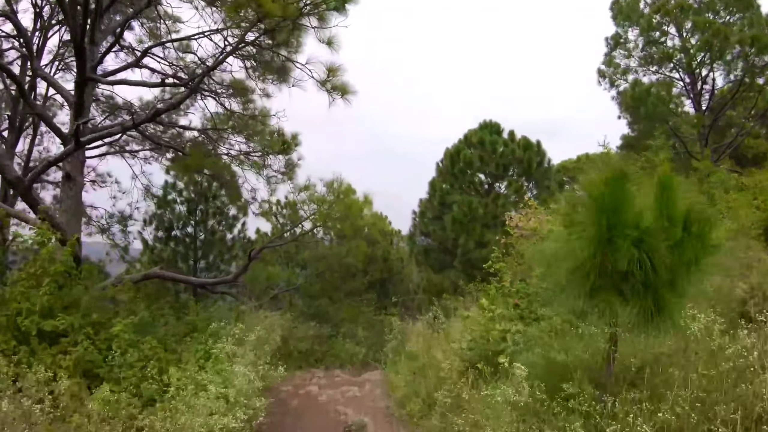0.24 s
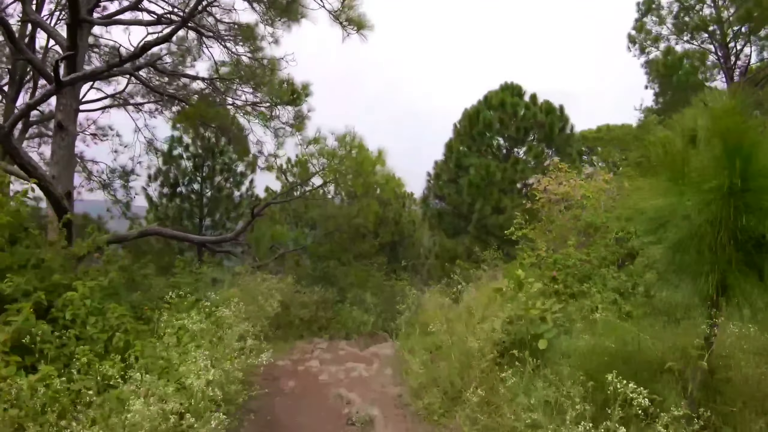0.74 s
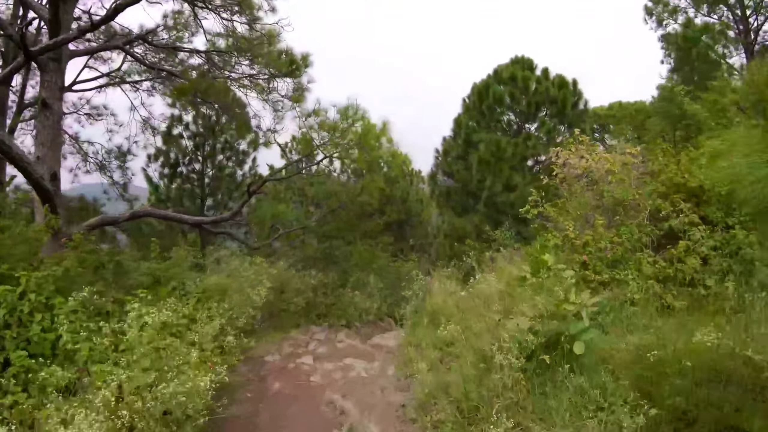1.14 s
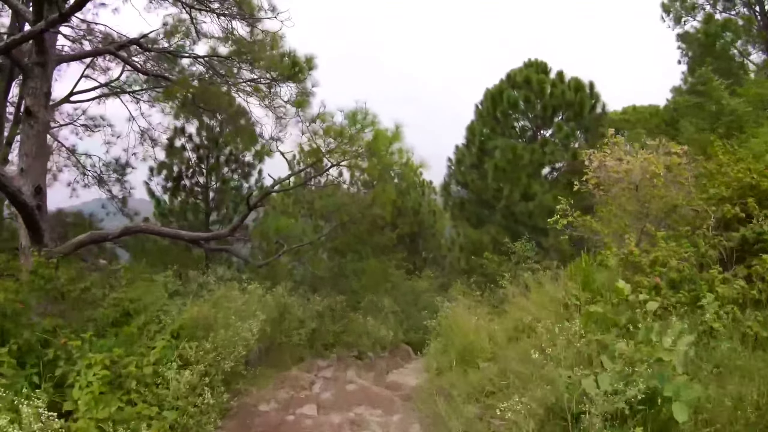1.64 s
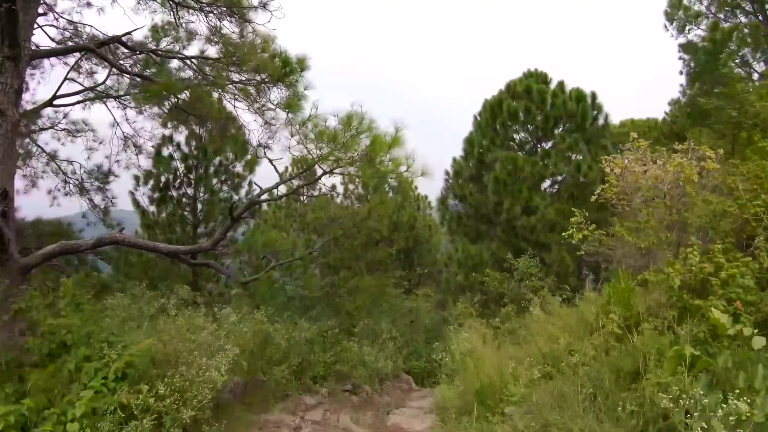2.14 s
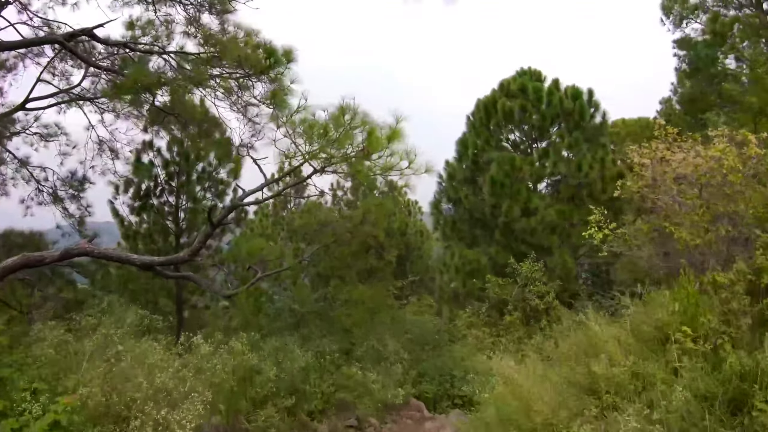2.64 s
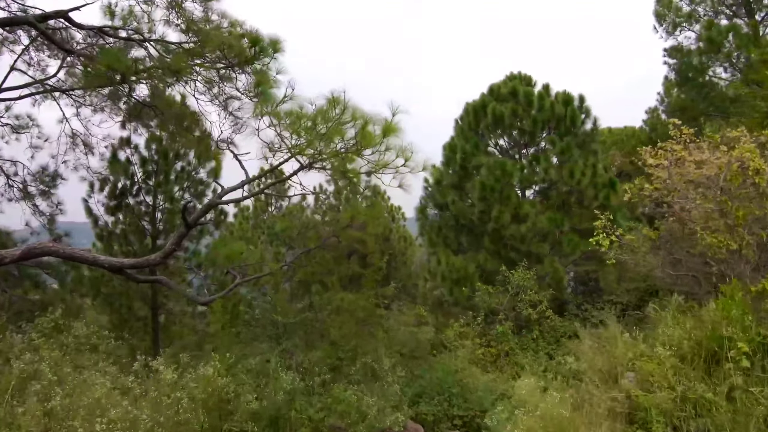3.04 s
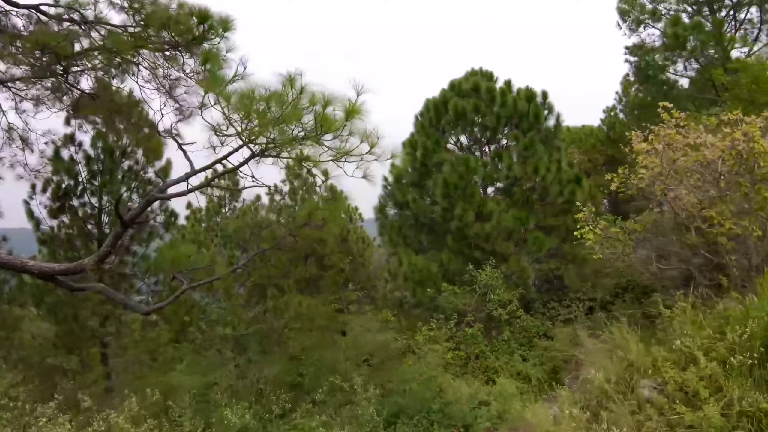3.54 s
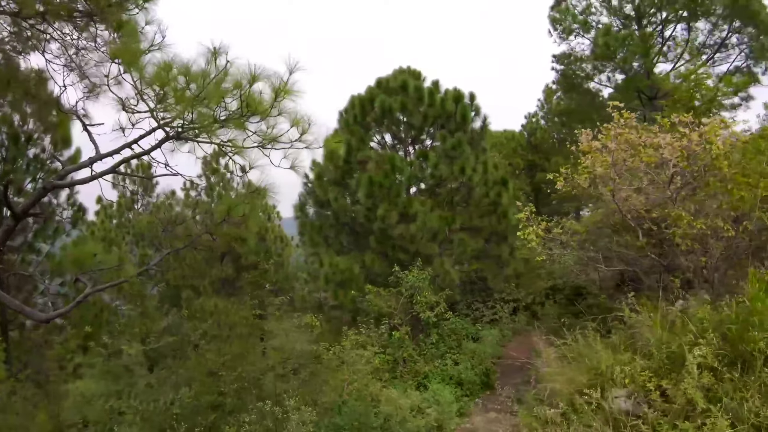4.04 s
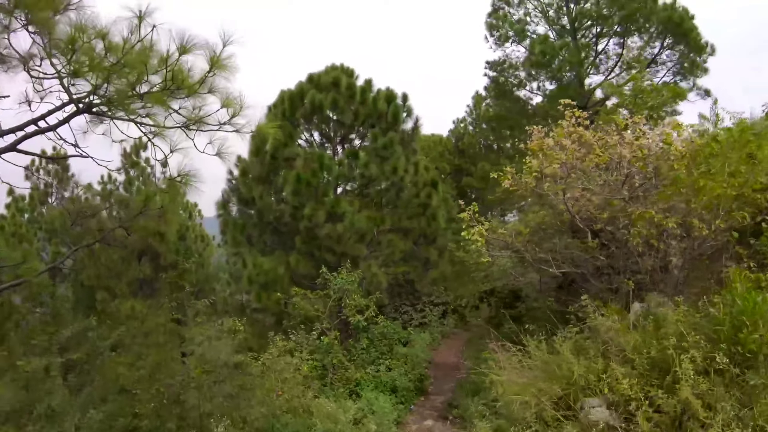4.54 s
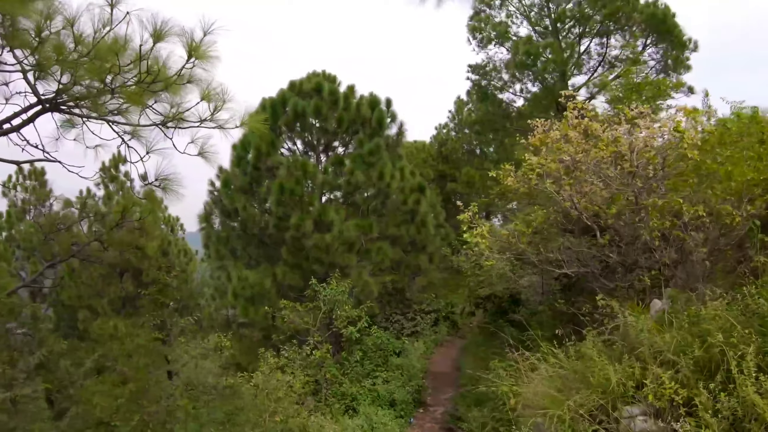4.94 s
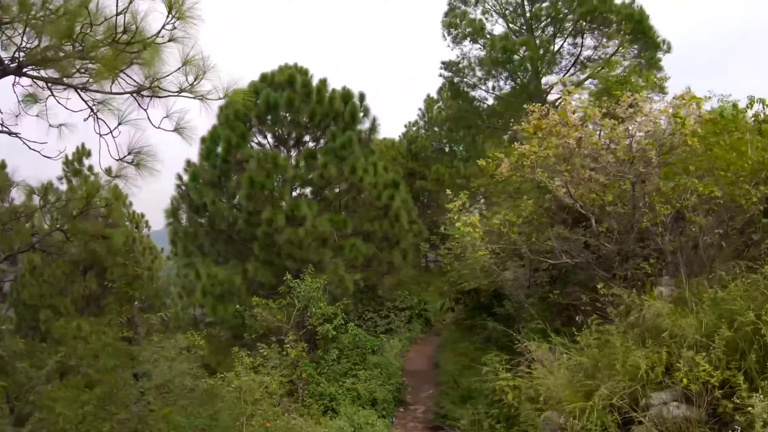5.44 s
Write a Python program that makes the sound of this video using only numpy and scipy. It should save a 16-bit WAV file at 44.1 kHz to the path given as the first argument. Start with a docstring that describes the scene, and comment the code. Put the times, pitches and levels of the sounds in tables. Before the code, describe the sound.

Slow footsteps crunch and click on a stony dirt trail while cicadas throb steadily and a small bird chips high and close by.

```python
"""Stony dirt trail in scrubby pine woodland, walked with the recorder held in the hand.
Soles crush grit (ringing grains), stones click (damped rings), knocks ring the recorder body (modes).
A cicada chorus throbs near 4 kHz under a thin higher band (pulsing noise), fringed by short faint notes.
A small bird close by repeats high, mostly falling chips; others call further off (gliding sines, echoed).
Wind in leaves, handling rumble, a faint hum and microphone hiss (shaped noise) lie beneath."""
import sys
import numpy as np
from scipy import signal
from scipy.fft import rfft, irfft, next_fast_len
from scipy.io import wavfile
from scipy.ndimage import uniform_filter1d

SR = 44100
rng = np.random.default_rng(int(sys.argv[2]) if len(sys.argv) > 2 else 0)


def dump_mix(stems):
    """Bounce the given channels to the path in sys.argv[1] as a 16-bit WAV at rate SR."""
    frames = np.atleast_2d(stems).T  # one column per channel
    limited = np.clip(frames, -1, 1)  # hard clip at full scale
    pcm = np.round(limited * 32767).astype(np.int16)
    wavfile.write(sys.argv[1], SR, pcm)


N = 250488

# wind in the scrub [time_s, level_db rms]
BREEZE = [(0, -71), (.3, -70.5), (1.4, -68.5), (2.1, -68.5), (2.5, -68), (3.3, -68), (4.6, -68.5),
          (5.68, -66)]
# spectrum of the leaves [freq_hz, relative_db per Hz]
LEAF_SPECTRUM = [(40, -60), (70, 5), (110, -3), (194, -6), (485, -3.5), (727, -4), (1300, -11),
                 (1870, -19.5), (2700, -28), (3300, -28.5), (5000, -43.5), (7000, -37)]
# each stride jolts the hand, a low rumble [peak_s, peak_db rms]
JOLTS = [(.26, -66), (.82, -66), (1.36, -69), (2.02, -66), (2.5, -64), (2.96, -74), (3.72, -74),
         (4.26, -67.5), (4.81, -56), (5.52, -58)]
JOLT_RISE_DB_PER_S, JOLT_FALL_DB_PER_S = 122, 51.5
# faint wavering hum near 135 Hz [time_s, level_db rms]
HUM = [(0, -86), (.75, -75), (1.25, -79), (2.0, -73.5), (2.8, -78.5), (3.2, -99), (3.8, -78), (4.6, -89),
       (5.68, -81)]
HISS_DB = -77   # microphone noise, rms before the top cut
# cicada chorus between throbs [time_s, level_db rms]
CICADAS = [(0, -63), (.15, -72), (.55, -71), (1.0, -70), (1.22, -71), (1.35, -71.5), (1.65, -64.5),
           (2.1, -69), (2.6, -66.5), (2.82, -62.5), (3.2, -67), (3.75, -63), (4.1, -67), (4.35, -67),
           (4.5, -65.5), (5.05, -67.5), (5.22, -71), (5.68, -62.5)]
# runs of throbs [first_s, last_s, period_s, lift_db]
THROBS = [(0.21, 1.003, 0.098, 6), (1.31, 1.73, 0.1, 6.5), (1.793, 2.105, 0.098, 0.5),
          (2.292, 2.92, .104, 4), (3.245, 3.79, .108, 4.5), (4.063, 4.37, 0.103, 5),
          (4.477, 5.04, .112, 12.5), (5.145, 5.49, 0.12, 5.5)]
CICADA_HZ, CICADA_WANDER_HZ = 3968, 50
# fainter, higher insect band [time_s, level_db rms]
HIGH_INSECTS = [(0, -78.5), (.8, -82.5), (1.7, -80.5), (2.9, -81), (5.68, -79.5)]
# short notes too blurred to count: distant birds, and a shimmer fringing the insects
# [time_s, low_whistlers_db rms, high_shimmer_db rms]
MURMUR = [(0, -95, -91), (.3, -74.5, -74), (.55, -89, -100), (1.0, -78, -100), (1.2, -84.5, -77),
          (1.35, -80, -98), (1.6, -79.5, -97), (1.95, -69, -96), (2.25, -77, -100), (2.95, -71.5, -92),
          (3.17, -71.5, -83), (3.6, -70.5, -84), (3.9, -70.5, -108), (4.15, -87, -87), (4.45, -80, -83),
          (4.9, -81, -100), (5.15, -80.5, -87), (5.68, -76.5, -75)]
# near bird, before arch and waver [start_s, length_s, start_hz, end_hz, peak_db dry]
CHIPS = [(0.174, 0.069, 6900, 7110, -57.5), (0.244, 0.033, 6800, 6390, -48.5),
         (0.405, 0.024, 6950, 6330, -42), (0.494, 0.023, 6730, 6360, -63), (.58, .04, 6840, 6770, -72),
         (0.868, 0.046, 7020, 6920, -49.5), (0.928, 0.012, 6700, 6900, -59), (0.98, 0.041, 6750, 6390, -55),
         (1.082, 0.02, 7140, 6110, -38.5), (1.175, 0.047, 6770, 6370, -68), (1.568, 0.042, 7040, 6690, -44),
         (1.727, 0.031, 6760, 6380, -49.5), (1.761, 0.03, 7170, 6050, -39.5),
         (1.846, 0.091, 6540, 6450, -62.5), (2.268, 0.036, 7040, 6790, -41),
         (2.323, 0.028, 7040, 6680, -57.5), (2.456, 0.036, 7140, 6170, -44), (2.59, 0.04, 6600, 6430, -72),
         (2.963, 0.034, 6950, 6760, -40), (3.135, 0.045, 6990, 6480, -46.5),
         (3.249, 0.032, 6800, 6400, -55), (3.668, 0.032, 7090, 6640, -39.5),
         (3.82, 0.026, 7060, 6310, -41.5), (4.008, 0.051, 6770, 6200, -65.5),
         (4.345, 0.031, 7050, 6640, -54), (4.368, 0.019, 6930, 6800, -40), (4.516, 0.031, 7180, 6230, -42),
         (5.023, 0.036, 6950, 6500, -54.5), (5.072, 0.027, 7010, 6780, -46),
         (5.217, 0.015, 7050, 6280, -43.5), (5.511, 0.046, 6740, 6480, -61.5)]
# far birds, before arch and waver [start_s, length_s, start_hz, end_hz, peak_db dry]
FAR_BIRDS = [(0.187, 0.0086, 5830, 5030, -63), (0.204, 0.02, 1850, 1840, -63.5),
             (0.272, 0.027, 5310, 5240, -69), (0.287, 0.025, 5370, 4930, -70),
             (0.442, 0.022, 3190, 3060, -65), (1.378, 0.035, 1814, 1610, -59.5),
             (1.736, 0.09, 1900, 1827, -60), (1.8, 0.056, 1936, 1560, -64), (1.81, 0.062, 2615, 2304, -54),
             (2.034, 0.074, 1630, 1900, -67), (2.246, 0.036, 3280, 3000, -63.5),
             (2.388, 0.052, 2730, 2556, -57.5), (2.675, 0.12, 2730, 2540, -68),
             (2.79, 0.021, 5380, 4530, -60), (2.824, 0.018, 5260, 4380, -52.5),
             (2.862, 0.0098, 5130, 4200, -51), (3.155, 0.024, 3350, 3400, -60),
             (3.171, 0.017, 5000, 5040, -67), (3.286, 0.06, 2260, 3550, -55.5),
             (3.319, 0.06, 3110, 2940, -53), (3.428, 0.0616, 2448, 2184, -55.5),
             (3.507, 0.038, 3070, 2700, -52.5), (4.25, 0.02, 3660, 3670, -61),
             (5.141, 0.01, 3710, 3776, -60), (5.168, 0.014, 3800, 3520, -53),
             (5.264, 0.041, 3710, 3560, -67), (5.344, 0.054, 3410, 3570, -66),
             (5.466, 0.016, 3620, 3510, -50), (5.563, 0.023, 3730, 3600, -56.5),
             (5.662, 0.013, 3710, 3640, -56)]
# scuffs of the sole [start_s, length_s, crunch_db, litter_db]
SCUFFS = [(0.189, 0.045, -63, -80), (0.262, 0.036, -68, -81), (0.774, 0.074, -56.5, -72),
          (0.94, 0.071, -67.5, -88), (1.307, .09, -57, -71.5), (1.88, 0.032, -49, -71),
          (1.969, 0.035, -64, -81), (2.411, 0.11, -57, -75.5), (2.934, 0.035, -63.5, -78.5),
          (3.43, 0.088, -66, -83), (3.513, 0.098, -58.5, -71.5), (3.857, 0.054, -61.5, -80),
          (4.158, 0.23, -70, -90), (4.335, 0.033, -71.5, -80), (4.413, 0.11, -68, -84.5),
          (4.724, 0.015, -44.5, -71), (4.745, 0.071, -66.5, -76), (4.79, .05, -58, -88),
          (4.94, 0.016, -72, -69), (5.114, 0.099, -78, -75.5), (5.424, 0.052, -59.5, -75.5),
          (5.487, 0.046, -58.5, -77)]
# spectrum of the crunch [freq_hz, relative_db per Hz]
CRUNCH_SPECTRUM = [(170, 4), (400, -5.5), (900, -2), (1600, -2.5), (2600, -12.5), (4500, -14.5)]
# spectrum of the dry litter [freq_hz, relative_db per Hz]
LITTER_SPECTRUM = [(3200, -27), (5500, 7), (8500, 7.5), (10500, -1), (12000, -17)]
SCUFF_ATTACK_S, SCUFF_RELEASE_S = 0.013, 0.052   # from and to 30 dB down, before litter smoothing
CRUNCH_FADE_DB, LITTER_FADE_DB = 7, -0.5   # loss over the length of a scuff
LITTER_SMOOTH_S = 0.022
# stones and twigs that click [start_s, ring_db, ring_hz, snap_db, snap_hz]
CLICKS = [(0.205, -59, 1820, -62, 5300), (.28, -48.5, 504, -68, 5300), (.45, -65, 3000, -54, 4300),
          (.781, -50, 840, -72, 6900), (0.835, -52, 715, -65, 8600), (0.96, -55.5, 1380, -74, 6000),
          (1.307, -52, 1220, -80, 6070), (1.348, -53, 1190, -57, 8900), (1.883, -39, 1160, -63, 3000),
          (1.891, -51, 1040, -60, 5900), (1.962, -45.5, 460, -56, 2960), (2.211, -57, 2830, -77, 4830),
          (2.409, -52.5, 1230, -77, 5000), (2.837, -50, 2680, -72, 5960), (3.584, -46.5, 2380, -68, 6500),
          (3.602, -49, 1310, -68, 6630), (3.868, -53.5, 990, -70, 7950), (3.925, -51, 1310, -64, 7050),
          (4.156, -67, 1426, -56, 8160), (4.52, -67, 512, -62, 4870), (4.659, -59, 1500, -60, 8160),
          (4.726, -65, 620, -45, 6650), (4.727, -35, 1920, -43, 8160), (4.7999, -43.5, 690, -37.5, 1803),
          (4.802, -32, 2800, -41, 5700), (5.0948, -37, 4600, -34, 6320), (5.106, -43, 4800, -50, 5800),
          (5.236, -49, 3400, -60, 4500), (5.426, -57, 860, -64, 4960), (5.446, -74, 660, -54, 7140),
          (5.5013, -42.5, 760, -48.5, 1790), (5.501, -39.5, 2940, -49, 4330)]
# knocks on the recorder body [time_s, strength_db, hardness_db one octave above the lowest mode]
KNOCKS = [(0.503, -52.5, -5), (1.032, -65, 8), (1.04, -56, 5), (1.049, -60.5, 9), (2.005, -44, -1.5),
          (2.022, -41, 0.5), (2.07, -55, -4), (2.523, -52.5, 2.5), (2.701, -68.5, 7), (3.172, -52, -8),
          (4.236, -59, 2), (4.788, -31.5, -16), (4.8007, -30, 5), (4.837, -20, -2), (4.897, -39.5, -4),
          (5.386, -57, -9), (5.487, -39.5, 1.5), (5.5011, -30.5, 7), (5.532, -32.5, 0), (5.594, -62.5, 8)]
# modes of the recorder body [mode_hz, relative_db, t60_s]
BODY_MODES = [(88, 0, 0.11), (133, -14, 0.083), (231.3, -2.5, 0.07), (294, -19, 0.043), (591, -37, 0.33)]
CUTOFF_HZ = 15850


def from_db(db):
    """dB to amplitude gain."""
    return 10 ** (np.asarray(db) / 20)


def rms_one(x):
    """Scale to rms 1."""
    return x / np.sqrt(np.mean(x ** 2) + 1e-20)


def in_time(rows, outside=None):
    """Columns of a curve table, interpolated at every sample."""
    time_s, *columns = np.transpose(rows)
    t = np.arange(N) / SR
    return [np.interp(t, time_s, column, outside, outside) for column in columns]


def slow(rate_hz):
    """Random drift: noise low-passed twice, spread 1, filter start-up dropped."""
    r = np.exp(-2 * np.pi * rate_hz / SR)
    noise = rng.standard_normal(N + SR)
    return rms_one(signal.lfilter([1], [1, -2 * r, r * r], noise)[SR:])


def coloured(x, spectrum):
    """Give a flat signal a spectrum, log-interpolated in frequency; rms 1."""
    size = next_fast_len(N)
    hz, db = np.transpose(spectrum)
    log_bins = np.log(np.fft.rfftfreq(size, 1 / SR) + 1)
    shape_db = np.interp(log_bins, np.log(hz), db, -80, -80)
    return rms_one(irfft(rfft(x, size) * from_db(shape_db), size)[:N])


def buzz(centre_hz, width_hz, pulse_hz, depth, order=4):
    """Noise band, steep-sided, around a fixed or moving centre, pulsing unevenly; rms 1."""
    low = signal.butter(order, width_hz / 2, fs=SR, output="sos")
    a, b = signal.sosfilt(low, rng.standard_normal((2, N)))
    carrier = 2 * np.pi * np.cumsum(centre_hz * np.ones(N)) / SR
    pulse = 2 * np.pi * np.cumsum(pulse_hz * (1 + 0.1158 * slow(5.78))) / SR
    band = a * np.cos(carrier) + b * np.sin(carrier)
    return rms_one(band * (1 + depth * np.cos(pulse)))


def ring(hits, hz, t60_s):
    """Two-pole resonator: a unit hit starts a sine decaying from height 1."""
    r, w = from_db(-60 / (t60_s * SR)), 2 * np.pi * hz / SR
    return signal.lfilter([0, np.sin(w)], [1, -2 * r * np.cos(w), r * r], hits + 1e-18)


def scrub_echo(x, t60_s, wet_db, far_db=-60):
    """Bushes scatter sound back as a short dying hiss, distant trunks as a fainter, longer one."""
    t = np.arange(int(.5 * SR)) / SR
    decay = from_db(-60 * t / t60_s) + from_db(far_db - 60 * t / 1.13)
    tail = rng.standard_normal(len(t)) * decay * np.minimum(t / 0.0031, 1)
    tail = tail / np.sqrt(np.sum(tail ** 2))
    return x + from_db(wet_db) * signal.fftconvolve(x, tail)[:N]


def jolt_level_db():
    """Handling rumble level: fast rise to each jolt, slower fall; the loudest counts."""
    peak_s, peak_db = np.transpose(JOLTS)
    since_s = np.arange(N) / SR - peak_s[:, None]
    slope = np.where(since_s < 0, JOLT_RISE_DB_PER_S, -JOLT_FALL_DB_PER_S)
    return np.max(peak_db[:, None] + slope * since_s, axis=0)


def background():
    """Gusting leaves as shaped noise, rumble and hum as low noise bands, flat hiss."""
    wind_db, = in_time(BREEZE)
    hum_db, = in_time(HUM)
    leaves = from_db(wind_db + 1.2 * slow(9.0)) * coloured(rng.standard_normal(N), LEAF_SPECTRUM)
    rumble = from_db(jolt_level_db()) * buzz(36, width_hz=34, pulse_hz=3.2, depth=0.16)
    hum = from_db(hum_db) * buzz(135, width_hz=29.5, pulse_hz=2.5, depth=0.052)
    hiss = from_db(HISS_DB) * rng.standard_normal(N)
    return leaves + rumble + hum + hiss


def throb_lift_db():
    """Lift of the chorus: runs of even cosine-squared swells, about nine a second."""
    t, lift = np.arange(N) / SR, 0
    for first_s, last_s, period_s, lift_db in THROBS:
        during = (t > first_s - period_s / 2) & (t < last_s + period_s / 2)
        swell = np.cos(np.pi * (t - first_s) / period_s) ** 2
        lift = np.maximum(lift, during * lift_db * swell)
    return lift


def insects():
    """Many cicadas blur to a wide band, two singers to purer wavering ones; a thin band lies above."""
    level_db, = in_time(CICADAS)
    level_db = level_db + throb_lift_db() + 1.2 * slow(20)
    hz = CICADA_HZ + CICADA_WANDER_HZ * slow(4.3)
    chorus = buzz(hz, width_hz=484, pulse_hz=85.0, depth=0.061, order=3)
    singers = sum(buzz(hz + 90 * slow(14), width_hz=52, pulse_hz=87.5, depth=0.32) for _ in range(2))
    cicadas = from_db(level_db) * rms_one(chorus + from_db(-4) * singers)
    high_db, = in_time(HIGH_INSECTS)
    high = buzz(6710, width_hz=900, pulse_hz=80.3, depth=0.13, order=2)
    return cicadas + from_db(high_db + 2.0 * slow(33)) * high


def whistles(notes, rise, arch, waver):
    """Near-pure gliding sines that swell and fade; pitch arches and wavers."""
    out, unsteady = np.zeros(N + SR), 1 + waver * slow(45.4)
    for start_s, length_s, start_hz, end_hz, peak_db in notes:
        u = np.linspace(0, 1, round(length_s * SR))
        at = round(start_s * SR)
        glide_hz = start_hz + (end_hz - start_hz) * u
        hz = glide_hz * (1 + arch * (np.sin(np.pi * u) - .7))
        hz = hz * np.resize(unsteady[at:], len(u))
        swell = np.sin(np.pi * u ** rise) ** 2
        out[at:at + len(u)] += from_db(peak_db) * swell * np.sin(2 * np.pi * np.cumsum(hz) / SR)
    return out[:N]


def murmur(level_db, low_hz, high_hz, longest_s, count):
    """Many short chance notes, heard mostly as their echo; longest_s adds to 12 ms."""
    draw = rng.random((count, 5))
    start_s = draw[:, 0] * (N / SR - .1)
    length_s = .012 + longest_s * draw[:, 1]
    start_hz = low_hz + (high_hz - low_hz) * draw[:, 2]
    end_hz = start_hz * (.86 + .22 * draw[:, 3])
    notes = np.c_[start_s, length_s, start_hz, end_hz, 9 * draw[:, 4]]
    calls = whistles(notes, rise=1.0, arch=0.049, waver=0.0255)
    return from_db(level_db) * rms_one(scrub_echo(calls, t60_s=0.23, wet_db=9.5))


def distant_notes():
    """Low whistlers far off, and short faint high notes fringing the insects, blurred by echo."""
    low_db, high_shimmer_db = in_time(MURMUR)
    whistlers = murmur(low_db, 1496, 3400, longest_s=0.0435, count=500)
    shimmer = murmur(high_shimmer_db, 4400, 5500, longest_s=0.0069, count=300)
    return whistlers + shimmer


def near_bird():
    """High gliding chips with a light echo."""
    chips = whistles(CHIPS, rise=0.77, arch=0.0082, waver=0.006)
    return scrub_echo(chips, t60_s=0.1, wet_db=-7, far_db=-29)


def far_birds():
    """Separate gliding calls with more echo than the near bird."""
    calls = whistles(FAR_BIRDS, rise=0.89, arch=0.0081, waver=.016)
    return scrub_echo(calls, t60_s=0.14, wet_db=-4, far_db=-12)


def grains(per_s, spread_db):
    """Random hits of either sign, a few much larger than the rest."""
    sizes = from_db(spread_db * np.minimum(rng.exponential(1, N), 4)) * rng.choice([-1, 1], N)
    return sizes * (rng.random(N) < per_s / SR)


def grit(spectrum, per_s, spread_db, cycles, patchy_db):
    """Grains ring briefly at 16 pitches, each pitch drifting in level; rms 1."""
    hz, db = np.transpose(spectrum)
    pitches_hz = np.geomspace(hz[0], hz[-1], 16)
    hits, dealt = grains(per_s, spread_db), rng.integers(0, 16, N)
    out = 0
    for k, pitch_hz in enumerate(pitches_hz):
        level_db = np.interp(np.log(pitch_hz), np.log(hz), db)
        gain = from_db(level_db + patchy_db * slow(15))
        rounded = ring(gain * hits * (dealt == k), pitch_hz, 3.0 / pitch_hz)   # crushed, not snapped
        # short rings need more height
        out = out + pitch_hz ** 2 * ring(rounded, pitch_hz, cycles / pitch_hz)
    return rms_one(out)


def scuff_gain(levels_db, fade_db):
    """Summed gain of all scuffs: quick rise, slope while the sole rolls, release."""
    out = 0
    for (start_s, length_s, *_), top_db in zip(SCUFFS, levels_db):
        end_s, last_db = start_s + length_s, top_db - fade_db
        shape = [(start_s - SCUFF_ATTACK_S, top_db - 30), (start_s, top_db),
                 (end_s, last_db), (end_s + SCUFF_RELEASE_S, last_db - 30)]
        out = out + from_db(in_time(shape, outside=-200)[0])
    return out


def footfalls():
    """Grit crushed under the sole; dry litter hisses around it, swelling more gently."""
    _, _, crunch_db, litter_db = np.transpose(SCUFFS)
    crunch = grit(CRUNCH_SPECTRUM, 2500, spread_db=3.0, cycles=11.0, patchy_db=4.5)
    litter = grit(LITTER_SPECTRUM, 3500, spread_db=1.0, cycles=15.0, patchy_db=2.5)
    swell = uniform_filter1d(scuff_gain(litter_db, LITTER_FADE_DB), round(LITTER_SMOOTH_S * SR))
    return scuff_gain(crunch_db, CRUNCH_FADE_DB) * crunch + swell * from_db(1.2 * slow(26)) * litter


def burst(hz, cycles):
    """Two like resonators in series: a short ring that swells, then dies; height 1."""
    tap = 1.0 * (np.arange(SR // 25) == 0)
    wave = ring(ring(tap, hz, cycles / hz), hz, cycles / hz)
    return wave / np.abs(wave).max()


def clicks():
    """Each click: a well damped ring of the stone plus a snap, echoed by the scrub."""
    out = np.zeros(N + SR)
    for start_s, ring_db, ring_hz, snap_db, snap_hz in CLICKS:
        stone = from_db(ring_db) * burst(ring_hz, cycles=6.0)
        snap = from_db(snap_db) * burst(snap_hz, cycles=19.0)
        out[round(start_s * SR):][:len(stone)] += stone + snap
    return scrub_echo(out[:N], t60_s=0.06, wet_db=-8)


def knocks():
    """A soft contact rings the hollow body; the capsule feels the swing, not the steady push."""
    time_s, strength_db, hardness_db = np.transpose(KNOCKS)
    out = 0
    for mode_hz, mode_db, t60_s in BODY_MODES:
        blows = np.zeros(N)
        octaves = np.log2(mode_hz / BODY_MODES[0][0])
        # harder contacts favour the upper modes
        blow_db = strength_db + mode_db + octaves ** 1.14 * hardness_db
        blows[np.round(time_s * SR).astype(int)] = from_db(blow_db)
        out = out + ring(blows, mode_hz, t60_s)
    soft = signal.lfilter(*signal.butter(2, 560, fs=SR), out)
    return signal.sosfilt(signal.butter(3, 68, "high", fs=SR, output="sos"), soft)


def scene():
    """Sum of all sources at the single microphone."""
    steady = background() + insects()
    notes = distant_notes() + near_bird() + far_birds()
    walker = footfalls() + clicks() + knocks()
    return (steady + notes + walker)[None]


def record(dry):
    """Steep elliptic low-pass cuts the top."""
    return signal.sosfilt(signal.ellip(12, .3, 60, CUTOFF_HZ, fs=SR, output="sos"), dry)


dry = scene()
out = record(dry)
dump_mix(out)
```